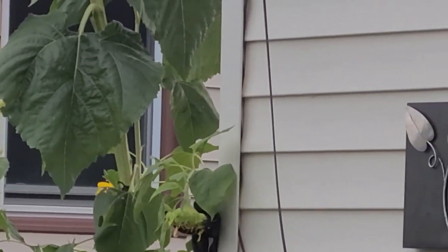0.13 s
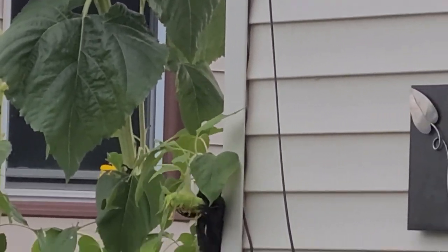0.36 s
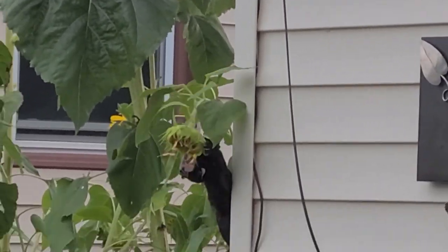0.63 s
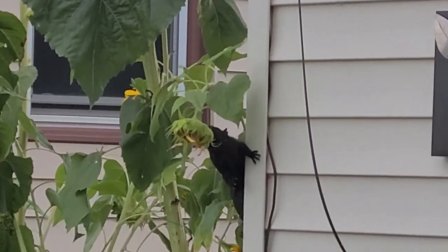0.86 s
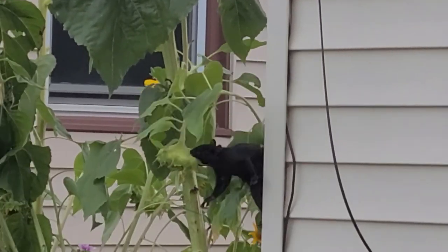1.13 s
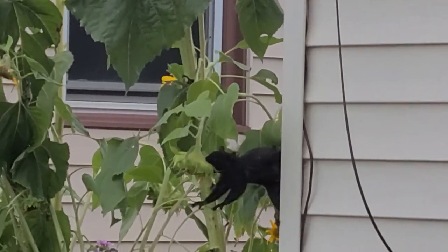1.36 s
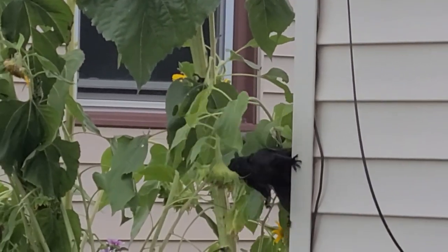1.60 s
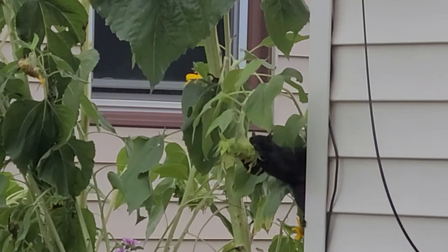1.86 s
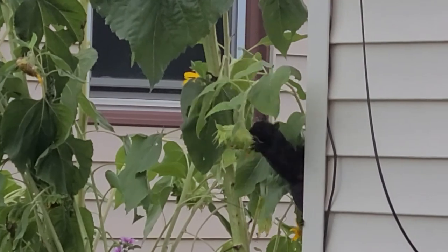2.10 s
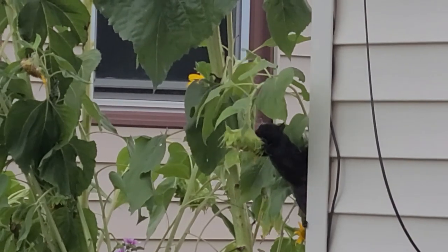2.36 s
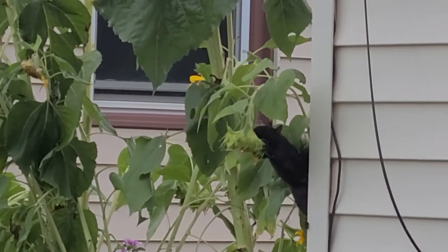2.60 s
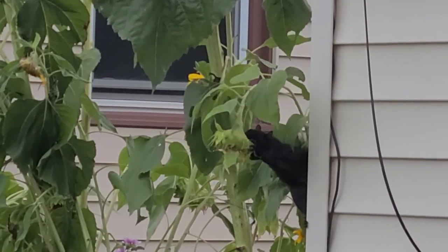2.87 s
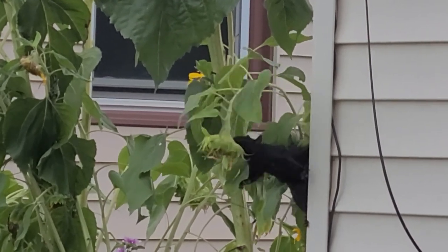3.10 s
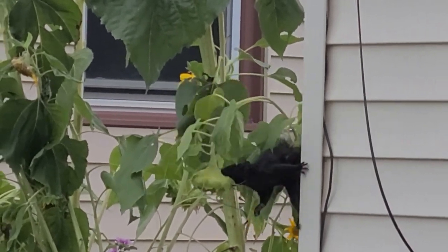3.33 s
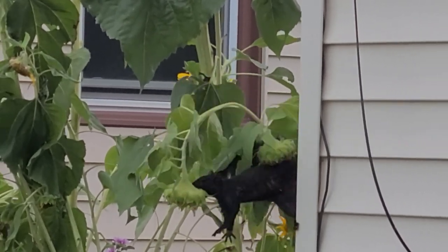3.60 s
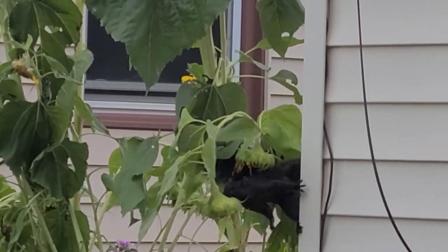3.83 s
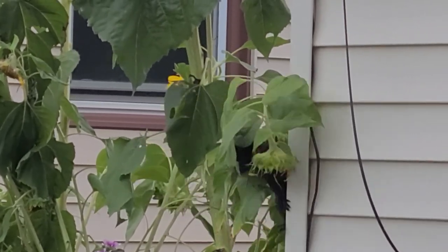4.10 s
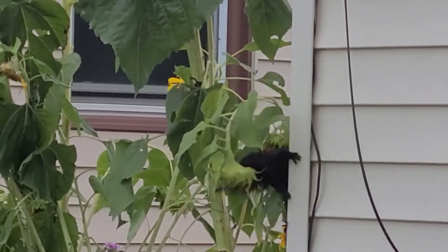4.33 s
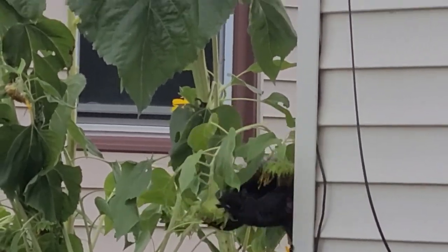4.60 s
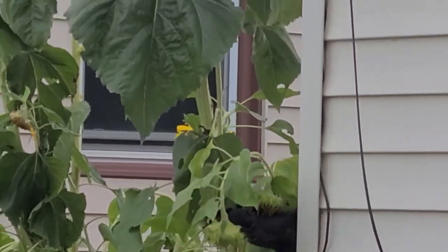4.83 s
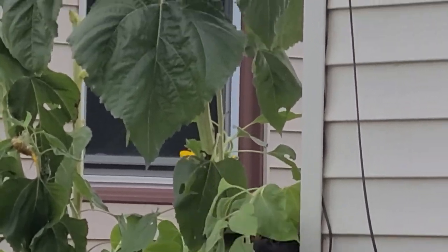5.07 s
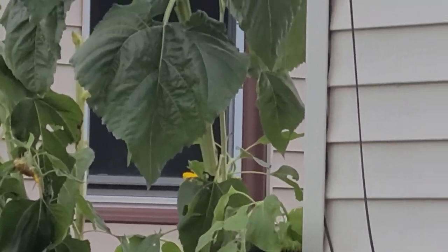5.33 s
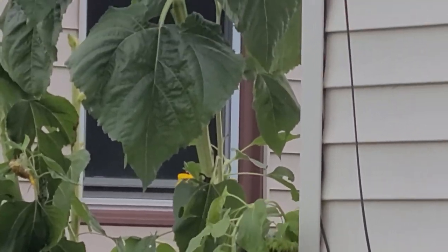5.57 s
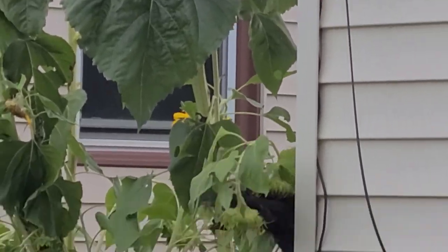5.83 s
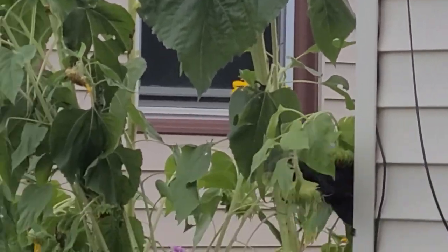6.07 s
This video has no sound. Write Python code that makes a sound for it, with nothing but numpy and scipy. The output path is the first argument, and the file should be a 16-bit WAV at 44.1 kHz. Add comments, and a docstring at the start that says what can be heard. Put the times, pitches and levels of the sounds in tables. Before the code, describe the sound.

Outdoors by a house wall, bright cricket chirps repeat over low engine drone and faint insect trills, with small plant snaps, leaf rustles and two soft knocks.

```python
"""A garden beside a house wall, heard with two spaced microphones. A near field cricket chirps in
threes: falling whistles that wall and ground repeat. Fainter insects, resonant bursts of noise, trill
farther off over the rumble of distant traffic: coloured noise and wavering engine drones. A squirrel
climbing a sunflower rustles leaves (crackling noise), snaps stems and knocks the siding (ringing modes).
Near the end a faint low tone drifts through."""
import sys
import numpy as np
from scipy import signal
from scipy.fft import rfft, irfft
from scipy.io import wavfile
from scipy.ndimage import uniform_filter1d

SR = 44100
rng = np.random.default_rng(int(sys.argv[2]) if len(sys.argv) > 2 else 0)


def gain_from_db(level_db):
    """Convert decibel levels to linear amplitude factors (20 dB per decade)."""
    decades = np.asarray(level_db, float) / 20
    return 10 ** decades


def int16_out(signal):
    """Quantize to a 16-bit WAV file."""
    q = np.round(np.clip(np.atleast_2d(signal).T, -1, 1) * 32767)
    wavfile.write(sys.argv[1], SR, q.astype(np.int16))


N = 273420  # samples


def evened(x):
    """Scales a sound to rms 1."""
    return x / np.sqrt(np.mean(x ** 2) + 1e-20)


def read(points, hz):
    """Reads a spectrum between its points on a logarithmic frequency axis."""
    point_hz, value = np.transpose(points)
    return np.interp(np.log(hz + 1), np.log(point_hz + 1), value)


def curve(rows):
    """Columns of a table in time, one value a sample."""
    s, *columns = np.transpose(rows)
    return [np.interp(np.arange(N) / SR, s, column) for column in columns]


def add(mix, s, sound):
    """Mixes a sound in at time s, cut off where the mix ends."""
    part = mix[..., round(s * SR):][..., :sound.shape[-1]]
    part += sound[..., :part.shape[-1]]


def panned(x, lean_db):
    """Splits a left-over-right level difference between the two microphones."""
    return x * gain_from_db([[lean_db / 2], [-lean_db / 2]])


def wander(span_s):
    """Slow random drift of rms 1: noise averaged twice over span_s."""
    size = round(span_s * SR)
    once = uniform_filter1d(rng.standard_normal(N), size=size)
    return evened(uniform_filter1d(once, size=size))


def swells(rows, rest_db, rise):
    """Gain that rests at rest_db and rises to a pointed peak for every row; rise is a share of its length."""
    t = np.arange(N) / SR
    power = gain_from_db(rest_db) ** 2
    for s, length, db in rows:
        peak = np.interp(t, [s - rise * length, s, s + (1 - rise) * length], [0, 1, 0])
        power = power + (gain_from_db(db) * peak) ** 2
    return np.sqrt(power)


def resonate(x, hz, width):
    """A resonance of gain 1 that follows hz: shift it to zero, smooth, shift back."""
    turn = np.exp(2j * np.pi * np.cumsum(hz * np.ones(N)) / SR)
    r = np.exp(-np.pi * width / SR)
    return 2 * (turn * signal.lfilter([1 - r], [1, -r], x / turn)).real


def coloured(x, points):
    """Filters a sound by a spectrum in dB."""
    hz = np.fft.rfftfreq(x.shape[-1], 1 / SR)
    return irfft(rfft(x) * gain_from_db(read(points, hz)), x.shape[-1])


def struck(modes, near_hz, t, fall_db):
    """Modes of a struck body die away; those far from near_hz lose fall_db an octave."""
    ring = np.zeros(len(t))
    for hz, db, t60 in modes:
        away_db = fall_db * abs(np.log2(hz / near_hz))
        ring += gain_from_db(db - 60 * t / t60 - away_db) * np.sin(2 * np.pi * hz * t)
    return ring


def garden(x, t60, start):
    """Diffuse echoes: a tap of random sign in every half millisecond, other taps for each microphone."""
    slots = np.arange(0, SR // 4, 22)
    at = slots + rng.integers(0, 22, (2, len(slots)))
    taps = np.zeros((2, SR // 4 + 22))
    np.put_along_axis(taps, at, rng.choice([-1., 1.], at.shape), 1)
    t = np.arange(taps.shape[1]) / SR
    taps *= gain_from_db(-60 * t / t60) * (t > start)
    taps /= np.linalg.norm(taps[0])
    return signal.fftconvolve(np.atleast_2d(x), taps, axes=1)[:, :x.shape[-1]]


def wing_stroke(db, bend, wobble):
    """One stroke is a whistle with two faint overtones; its pitch falls along the file of the wing."""
    full_stroke_s, full_db = .0205, -41.5  # strokes below full_db are shorter
    u = np.linspace(0, 1, round(SR * full_stroke_s * gain_from_db(.4 * min(db - full_db, 0))))
    hz = 5000 + 8 * bend - (337 + 15 * wobble) * u ** 1.5
    turns = 2 * np.pi * np.cumsum(hz) / SR
    tone = np.sin(turns) + gain_from_db(-37.5) * np.sin(2 * turns) + gain_from_db(-37) * np.sin(3 * turns)
    return gain_from_db(db) * np.sin(np.pi * u ** 1.2) ** .45 * tone


def cricket():
    """The near cricket strokes its wings in threes; wall and ground repeat each stroke, leaves scatter it."""
    # chirps: (first stroke [s], first to third stroke [s], level [dB])
    chirps = [(-.052, .0845, -42.5), (.407, .0845, -41.5), (.8948, .0857, -40), (1.2718, .0862, -41.3),
              (1.6468, .0856, -40.6), (2.0428, .0875, -40.6), (2.4891, .0848, -40.7),
              (2.9106, .0861, -40.6), (3.3552, .0856, -40.6), (3.7958, .0846, -39.9),
              (4.2509, .0933, -40.8), (4.8931, .0837, -42.8), (5.3679, .0834, -42.1), (5.662, .0853, -43.2),
              (6.0584, .0875, -41.9)]
    # strokes within a chirp: (share of its span, level re chirp [dB])
    three_strokes = [(.01, -3.8), (.458, -.3), (1, .3)]
    # sound paths from the cricket, one table a microphone: (delay [s], level [dB])
    paths = [
        [(0, 0), (.00622, -10), (.008425, -19), (.01492, -12), (.01927, -20), (.02356, -18), (.02792, -8),
         (.03138, -19)],
        [(.000527, -.3), (.005182, -8), (.01204, -13), (.027563, -4.5), (.033484, -13), (.041, -19),
         (.05023, -19)],
    ]
    lead = 2  # seconds before the start, so that an earlier stroke still echoes
    wings = np.zeros(N + lead * SR)
    for first_s, span, chirp_db in chirps:
        for share, step_db in three_strokes:
            stroke = wing_stroke(chirp_db + step_db, *rng.standard_normal(2))
            add(wings, first_s + share * span + lead, stroke)
    hz = np.fft.rfftfreq(len(wings), 1 / SR)
    responses = [sum(gain_from_db(db) * np.exp(-2j * np.pi * hz * s) for s, db in ear) for ear in paths]
    heard = irfft(rfft(wings) * np.array(responses), len(wings))
    # three scatterings fade into each other as leaves and listener move
    turn = 2 * np.pi * 0.347 * np.arange(len(wings)) / SR
    for k in range(3):
        heard += gain_from_db(-10.5) * garden(wings * np.cos(turn + k * np.pi / 3), t60=.25, start=.006)
    return heard[:, lead * SR:]


def air():
    """Traffic and garden air: random short-time spectra with soft patches, arriving from all sides."""
    # spectrum, relative: (frequency [Hz], level [dB per Hz])
    spectrum = [(25, -16.5), (39, -17), (55, -5.5), (96, -8.5), (120, -18.5), (270, -24), (420, -28),
                (780, -27), (960, -30.3), (1300, -29), (2300, -38.5), (5800, -44.5), (7140, -39.5),
                (9090, -56), (15600, -76.5)]
    # balance: (frequency [Hz], left over right [dB])
    balance = [(60, -0.5), (130, -2), (290, -0.5), (640, -0.5), (1410, 0.5), (3100, 1.0), (6820, 3.5),
               (15000, -6.5)]
    # tyre hiss comes and goes, used about its mean: (time [s], level [dB])
    tyre_hiss = [(0.0, -56.5), (1.69, -56), (2.0, -56.5), (4.14, -54.5), (4.28, -54), (5.13, -56),
                 (5.35, -57), (6.2, -54.5)]
    level_db, spacing_m = -43.5, 0.18  # rms of both channels; distance between the microphones
    frames, hz = N // 512 + 5, np.fft.rfftfreq(2048, 1 / SR)
    a, b, c, d, patches = rng.standard_normal((frames, 1025, 5)).T
    patches = uniform_filter1d(patches, size=8, axis=0)
    patches = evened(uniform_filter1d(patches, size=5, axis=1))
    s, swell_db = np.transpose(tyre_hiss)
    swell_db = np.interp((np.arange(frames) - 2) * 512 / SR, s, swell_db - swell_db.mean())
    # share of the swell that each frequency follows
    swelling = read([(150, 0.11), (700, 0.48), (3000, 0.94), (6000, 0.69)], hz)[:, None]
    # a diffuse field agrees between spaced microphones as a sinc of the spacing in wavelengths
    same = .985 * np.sinc(2 * hz * spacing_m / 343)[:, None]
    left = a + 1j * b
    right = same * left + np.sqrt(1 - same ** 2) * (c + 1j * d)
    z = np.array([left, right])
    z *= gain_from_db(read(spectrum, hz)[:, None] + 1.5 * patches + swelling * swell_db)
    z *= gain_from_db(read(balance, hz)[:, None] / 2 * np.array([1, -1])[:, None, None])
    return gain_from_db(level_db) * evened(signal.istft(z, nperseg=2048, noverlap=1536)[1][:, :N])


def drones():
    """Distant engines: each drone is a wavering tone with a narrow band of noise around it."""
    # engine drones in the traffic, each: (time [s], frequency [Hz], level [dB])
    low_drone = [(0, 53.67, -50.5), (.9, 52.34, -45.5), (1.6, 51.8, -46), (1.9, 51.06, -54),
                 (2.12, 50.75, -36.5), (2.7, 49.5, -47), (3.25, 48.6, -45.5), (3.5, 48.6, -54),
                 (4.4, 47.4, -49.5), (5, 45.7, -46), (5.4, 44.8, -49.5), (6.2, 44.8, -59)]
    mid_drone = [(0, 69.95, -45), (1.1, 69, -53), (1.4, 68.33, -45), (1.9, 65, -45), (2.4, 69, -46.5),
                 (3.5, 71.5, -45), (4.1, 70.25, -47), (4.5, 67.25, -57.5), (5, 67.14, -45),
                 (5.4, 61.1, -46), (6.2, 65.9, -61)]
    high_drone = [(2.2, 84, -47), (2.399, 88.2, -49.5), (2.9, 95, -54.5), (4.3, 95.5, -49),
                  (5.6, 95.35, -50), (6.2, 94.8, -61)]
    top_drone = [(0, 118, -60), (1, 116.8, -64), (3, 117.4, -59), (5.8, 116.8, -59), (6.2, 115.5, -65)]
    waver_hz, waver_db, waver_s = .7, 2.2, .07  # rms drift of pitch and level, averaging span
    out = np.zeros(N)
    for rows in (low_drone, mid_drone, high_drone, top_drone):
        hz, db = curve(rows)
        hz = hz + waver_hz * wander(waver_s)
        db = db + waver_db * wander(waver_s)
        tone = np.sqrt(2) * np.sin(2 * np.pi * (np.cumsum(hz) / SR + rng.random()))
        band = evened(resonate(resonate(rng.standard_normal(N), hz, 7.8), hz, 8.6))
        # fades in over the .2 s before its first row
        arrived = np.clip((np.arange(N) / SR - rows[0][0]) / .2 + 1, 0, 1)
        out += arrived * gain_from_db(db) * (tone + 0.51 * band)
    return panned(out, -1.3)


def insect(hz, width, per_s, depth):
    """Bursts of tooth strikes, as noise, ring a wing resonance (hz, width in Hz), smeared by distance."""
    phase = (per_s * np.arange(N) / SR + rng.random()) % 1
    strikes = rng.standard_normal((2, N)) * (1 - depth + depth * np.exp(-phase / .33))
    return evened(resonate(resonate(strikes, hz, width), hz, width))


def far_insects():
    """A steady trill, a buzz that comes in phrases, a low chorus, other crickets blurred together."""
    # buzz phrases: (peak time [s], length [s], level [dB])
    phrases = [(.65, 0.28, -78), (1.23, .2, -63), (1.83, .45, -74), (2.92, .25, -70), (3.28, .12, -75),
               (4.06, .3, -64), (4.58, .25, -73), (4.99, .6, -68)]
    trill = gain_from_db(-72.0) * insect(hz=6460, width=150, per_s=37.8, depth=0.88)
    buzz = insect(hz=7400, width=400, per_s=80.5, depth=0.89)
    buzz *= swells(phrases, rest_db=-78, rise=0.5)
    buzz *= gain_from_db(3 * wander(.12))  # random swell, 3 dB rms
    chorus = gain_from_db(-73) * insect(hz=3150, width=240, per_s=55, depth=.3)
    neighbours = gain_from_db(-74.5) * insect(hz=4830, width=170, per_s=20, depth=.3)
    return trill + buzz + chorus + neighbours


def rustle():
    """Leaves brush: dense tiny crackles of uneven size over a steady hiss."""
    # spectrum of leaves, relative: (frequency [Hz], level [dB per Hz])
    leaf = [(3000, -20), (7000, -2), (9500, 4), (13000, 7), (15600, 1)]
    # brushes: (peak time [s], length [s], level [dB])
    brushes = [(.46, .1, -78), (.78, .08, -76), (2.13, .12, -78), (2.92, .15, -78), (3.25, 0.027, -70),
               (3.81, 0.19, -69), (4.07, .08, -66), (4.14, 0.0092, -55), (4.2, 1.42, -76.5),
               (4.31, .08, -70), (4.52, .04, -68), (4.78, .11, -64.5), (4.96, .16, -72), (5.4, .5, -77),
               (5.75, 0.22, -73)]
    size = gain_from_db(2.7 * np.minimum(rng.exponential(1, (2, N)), 5))
    size *= rng.random((2, N)) < 2000 / SR  # about 2000 crackles a second
    crackle = evened(size * rng.standard_normal((2, N)))
    hiss = 1.1 * rng.standard_normal((2, N))
    leaves = evened(coloured(crackle + hiss, leaf))
    return panned(leaves * swells(brushes, rest_db=-78.5, rise=.45), -3.8)


def snaps():
    """Fibres break within milliseconds and ring the stem; a wide crack on top."""
    # snaps: (time [s], peak of the ring [dB], strongest ring [Hz], crack [dB], left over right [dB])
    breaks = [(1.591, -54, 3000, -12, 1), (2.8975, -48, 4150, -13, 1), (2.911, -47, 1940, -22, 1),
              (2.915, -50, 4100, -20, 0), (2.9325, -48, 6300, -7, 1), (2.947, -46, 2150, -20, 1),
              (2.955, -49, 2150, -22, 1), (3.24, -58, 3200, -6, 1), (3.888, -49, 2160, -22, 0),
              (4.138, -43, 3800, -9, 0), (4.1425, -45, 2310, -20, 0), (4.29, -42.5, 3350, -14, 0),
              (4.294, -47, 3550, -20, 0), (4.3065, -50, 6300, -10, 0), (4.521, -55, 2300, -6, 1)]
    # modes of the stem: (frequency [Hz], level [dB], 60 dB decay [s])
    stem = [(1883, -1, 0.077), (2150, 3, 0.057), (2314, 1, 0.061), (3210, 6.5, 0.068), (3530, -2, 0.028),
            (3860, 4, 0.023), (6480, 1, 0.02), (7300, 2, 0.022)]
    out, t = np.zeros((2, N)), np.arange(1500) / SR
    for s, db, near_hz, crack_db, lean_db in breaks:
        grain, noise = rng.standard_normal((2, 1500))
        fibres = (abs(grain) > 2.3) * grain / 3 * np.exp(-t / .005)  # only rare large values break
        fibres[0] = 0.54
        ring = np.convolve(fibres, struck(stem, near_hz, t, fall_db=28))[:1500]
        ring /= abs(ring).max()
        crack = coloured(noise, [(1500, -5), (4000, 19), (8000, 9.5), (15000, -39)])
        crack *= gain_from_db(crack_db - 60 * t / .018)
        add(out, s, panned(gain_from_db(db) * (ring + crack), lean_db))
    return out + gain_from_db(-7) * garden(out, t60=.15, start=.003)


def knocks():
    """Claws on siding: a soft double blow rings its hollow modes."""
    # knocks: (time [s], level [dB], strongest ring [Hz], left over right [dB])
    blows = [(1.6835, -36, 1000, 1), (3.9657, -39, 1400, 0)]
    # modes of the siding: (frequency [Hz], level [dB], 60 dB decay [s])
    siding = [(430, 0, .025), (500, 2, .027), (990, 2, .032), (1110, 1, .028), (1230, -1, .03),
              (1420, -3, .028), (1700, -3, .022), (1900, -8, .02), (2370, -8, .015)]
    out, t = np.zeros((2, N)), np.arange(3000) / SR
    for s, db, near_hz, lean_db in blows:
        body = struck(siding, near_hz, t, fall_db=4.2) * np.minimum(t / .0015, 1)  # soft onset
        add(out, s, panned(gain_from_db(db) * body, lean_db))
        add(out, s + 0.0031, panned(gain_from_db(db - 3) * body, lean_db))
    return out + gain_from_db(-8) * garden(out, t60=.08, start=.003)


def moan():
    """A faint low tone, wavering in pitch and level, drifts through far away."""
    # the tone: (time [s], frequency [Hz], level [dB])
    glide = [(5.58, 415, -68), (5.66, 423, -63), (5.76, 450, -68), (5.91, 470, -59), (6.02, 420, -62),
             (6.1, 402, -75)]
    hz, db = curve(glide)
    hz = hz + 5 * wander(.03)
    db = db + 2.5 * wander(.03)
    t = np.arange(N) / SR
    sounding = (t > glide[0][0]) & (t < glide[-1][0])
    return gain_from_db(db) * np.sin(2 * np.pi * np.cumsum(hz) / SR) * sounding


def scene():
    """All sources at the two microphones."""
    return cricket() + air() + drones() + far_insects() + rustle() + snaps() + knocks() + moan()


def top_cut(x):
    """Nothing passes above the cut-off."""
    return signal.sosfilt(signal.butter(12, 15730, fs=SR, output="sos"), x)


def record(dry):
    """The finished mix of both microphones, as stored."""
    return top_cut(dry)


dry = scene()
out = record(dry)
int16_out(out)
```